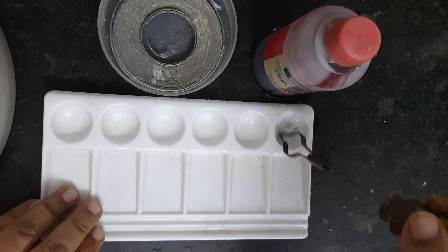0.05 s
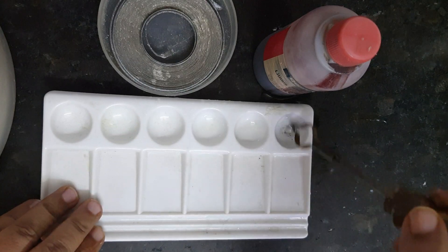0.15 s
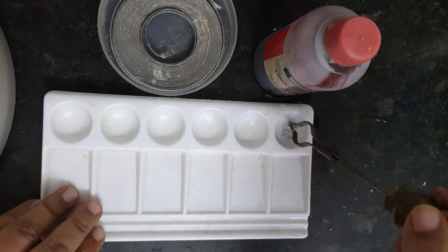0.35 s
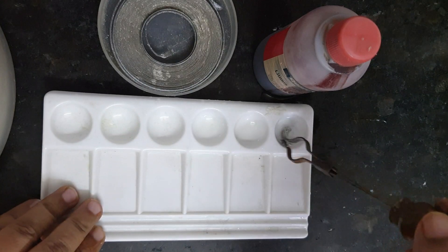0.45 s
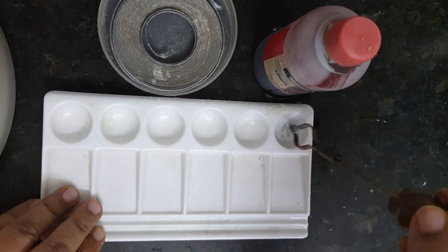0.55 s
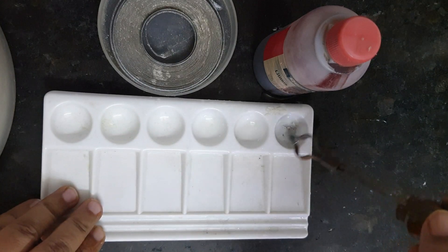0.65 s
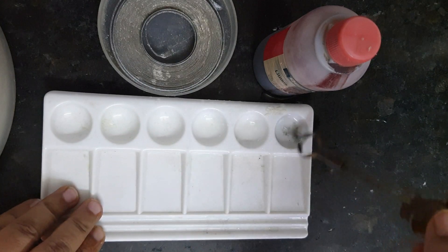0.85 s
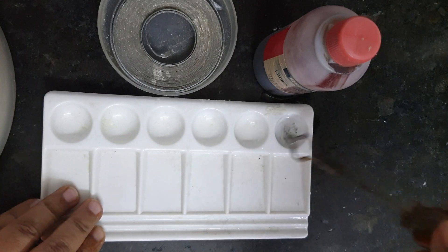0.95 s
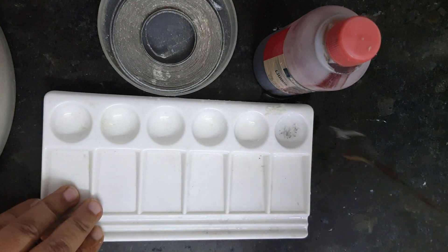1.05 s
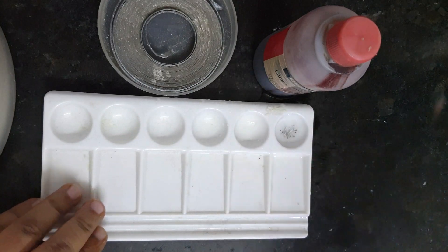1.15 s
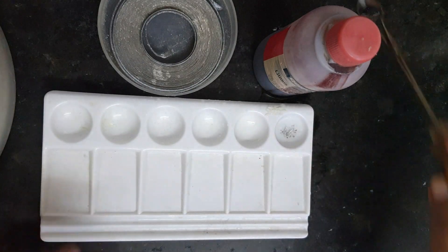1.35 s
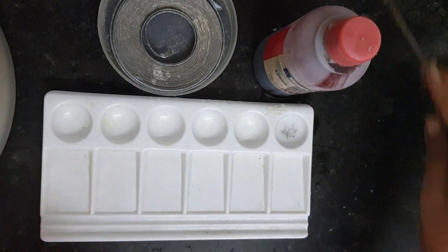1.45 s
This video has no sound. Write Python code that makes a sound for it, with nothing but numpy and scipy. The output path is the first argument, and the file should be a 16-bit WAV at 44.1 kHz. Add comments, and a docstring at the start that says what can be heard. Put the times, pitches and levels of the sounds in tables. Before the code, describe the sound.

Metal tongs stir wet powder in a ceramic well, close to a mono microphone. From 0 to 0.9 seconds come irregular light taps with short, hollow, damped rings, brief grainy scrapes and tiny squeaks. A squeaky scrape stands out near 0.2, firmer knocks near 0.4, 0.6 and 0.83. A short room tail fades into faint low hum and air; a very soft low bump comes around 1.4.

```python
"""Stirring powder with steel tongs

Steel tongs stir wet powder in the well of a ceramic tile, close by in a classroom. Their tips tap the well
(decaying modes), scrape across it (grainy friction noise) and catch in short stick-slip squeaks (harmonic tones).
Taps and scrapes ring the tile, and the room answers with near reflections and a tail.
The stirring stops, a hand leaves the table with a soft low bump, and the room's noise and hum remain."""
import sys
import numpy as np
from scipy import signal
from scipy.fft import rfft, irfft, next_fast_len
from scipy.io import wavfile
from scipy.ndimage import map_coordinates

SR = 44100
rng = np.random.default_rng(int(sys.argv[2]) if len(sys.argv) > 2 else 0)


def pcm_store(signal):
    """Save signal as 16-bit PCM."""
    levels = np.round(np.clip(np.atleast_2d(signal), -1, 1) * 32767)
    wavfile.write(sys.argv[1], SR, levels.astype(np.int16).T)


N = 66150

# Relative spectrum of steel grating on glaze. Each row: frequency in Hz, level in dB.
GRIT_SPECTRUM = [(300, -47.5), (1000, -13.5), (1700, 4), (2250, 4), (2600, 0), (3050, -10), (3600, -1.5),
                 (4300, -1), (6200, -0.5), (7400, -6), (8400, -1.5), (9300, -19.5), (11000, -11.5),
                 (13000, -42), (16000, -37)]


def taps():
    """Impact excitation: each tap knocks and flexes the tile and gives a short bright tick."""
    # Taps of the tips on the well. Each row: start in seconds, knock level in dB, bright tick level in dB.
    tap_list = [(.0905, -49, -73.5), (.0965, -48.5, -67), (0.154, -39.5, -61.5), (.1600, -42, -59),
                (.2485, -43, -52), (.3150, -43.5, -81), (.3890, -24.5, -55), (.3970, -35, -57.5),
                (.4235, -36.5, -67), (.5810, -32.5, -52), (.5868, -41, -47), (.5968, -34.5, -66.5),
                (.6360, -45.5, -74), (.6545, -45.5, -62.5), (.7630, -45.5, -75), (.8305, -22.5, -52.5)]
    flex_hz, flex_db, flex_t60_s = 428, -27.5, 0.06  # flexing of the whole tile, level against the knock
    tick_t60_s = 0.018
    out = np.zeros(N + SR)
    for start_s, knock_db, tick_db in tap_list:
        ring = tile_ring()
        t = np.arange(len(ring)) / SR
        flex_envelope = amp(flex_db - 60 * t / flex_t60_s) * (1 - np.exp(-t * flex_hz))
        flex = flex_envelope * np.sin(2 * np.pi * flex_hz * t)
        tick = noise(GRIT_SPECTRUM)[:len(t)] * amp(-60 * t / tick_t60_s)
        first = round(start_s * SR)
        out[first:first + len(t)] += amp(knock_db) * (ring + flex) + amp(tick_db) * tick
    return out[:N]


def scrapes():
    """Friction noise: uneven grains hiss at the tips and shake the tile into resonance."""
    # Scrapes through the powder. Each row: time of the peak, rise and fall in seconds,
    # tile level in dB, grit level in dB.
    scrape_list = [(.004, 0.0065, 0.039, -56, -63), (0.095, 0.023, 0.015, -61, -71),
                   (0.215, 0.018, 0.0095, -38.5, -52), (0.222, 0.0068, 0.0073, -40, -46.5),
                   (.255, 0.018, 0.0235, -54.5, -68), (0.43, 0.01045, 0.0078, -50.5, -60),
                   (.478, 0.06, 0.017, -56, -68), (0.544, 0.0083, 0.018, -57.5, -70.5),
                   (0.59, 0.0046, 0.018, -53, -55), (0.623, 0.045, 0.027, -53.5, -68),
                   (0.671, 0.0264, 0.0057, -53.5, -60.5), (0.765, 0.019, 0.0076, -52, -73.5),
                   (0.832, .005, .006, -57, -52.5), (0.855, 0.0068, 0.036, -50.5, -67),
                   (0.893, 0.0062, 0.0086, -51.5, -56)]
    grains_per_s, grain_db = 900, 3  # speed and depth of the unevenness
    grains = unit(amp(grain_db * wobble(grains_per_s)))
    shaking = grains * rng.standard_normal(N)
    body = unit(signal.fftconvolve(shaking, tile_ring())[:N])
    grit = grains * noise(GRIT_SPECTRUM)
    out = np.zeros(N)
    for peak_s, rise_s, fall_s, tile_db, grit_db in scrape_list:
        out += swell(peak_s, rise_s, fall_s) * (amp(tile_db) * body + amp(grit_db) * grit)
    return out


def squeaks():
    """Stick-slip oscillation: a tip catches at one of the tongs' resonances, an unsteady tone with overtones."""
    # Each row: time of the peak, rise and fall in seconds, mean pitch in Hz, rms level of the
    # fundamental at the peak in dB, then the second and the third partial in dB against the fundamental.
    squeak_list = [(.002, 0.018, 0.0071, 1450, -42, -33, -27), (.002, 0.012, 0.0079, 2010, -53, -11, -5.5),
                   (.214, 0.011, 0.0029, 875, -36, -38, -30.5),
                   (0.2185, 0.0078, 0.0043, 722, -24.5, -17, -37.5),
                   (0.216, 0.0075, 0.002, 1435, -34.5, -29, -35.5),
                   (0.212, 0.012, 0.022, 1968, -52.5, -26, -22), (.255, 0.01, 0.011, 735, -43, -8, -34.5),
                   (0.436, 0.012, 0.0042, 708, -35.5, -10.5, -50),
                   (0.588, 0.0025, 0.0028, 2252, -45, -15, -33),
                   (.588, 0.0053, 0.0035, 1298, -44.5, -15, -17.5),
                   (0.664, 0.018, 0.011, 1375, -62.5, -2, -32.5),
                   (.670, 0.0049, 0.0047, 2056, -52.5, -5.5, -6),
                   (.678, 0.00618, 0.00834, 1437, -48, -28.5, -26.5),
                   (0.884, 0.0046, 0.013, 2001, -45, -16, -13.5),
                   (0.895, 0.0084, 0.0075, 1446, -48, -45, -30),
                   (.901, .008, 0.0063, 690.5, -43.5, -7, -21)]
    pitch_scatter, wander_per_s = 0.016, 480  # fraction of the pitch, random knots a second
    fourth_drop_db = 3.5  # the fourth partial lies this far below the third
    out = np.zeros(N)
    for peak_s, rise_s, fall_s, hz, db, second_db, third_db in squeak_list:
        pitch = hz * (1 + pitch_scatter * wobble(wander_per_s))
        phase = 2 * np.pi * np.cumsum(pitch) / SR
        partials_db = [0, second_db, third_db, third_db - fourth_drop_db]
        tone = sum(amp(level) * np.sin(k * phase) for k, level in enumerate(partials_db, start=1))
        out += np.sqrt(2) * amp(db) * swell(peak_s, rise_s, fall_s) * tone
    return out


def tile_ring():
    """Modal synthesis: the tile's answer to one contact, a sum of decaying modes scaled to peak 1."""
    # Modes before radiation and damping. Each row: frequency in Hz, mean level in dB, t60 in seconds.
    modes = [(623.2, -8.5, 0.053), (754.4, -1, 0.045), (856.7, 7, 0.019), (926, -3.5, 0.021),
             (1062, -5.5, 0.027), (1243, -15, .025), (1450, -31, 0.046), (2097, -33.5, .04),
             (2213, -25.5, .03)]
    spot_db = 2.5  # scatter of the mode levels from one spot to another
    contact_s = 0.00077  # rise of a knock
    low_hz, high_hz = 631, 1780
    t = np.arange(SR // 5) / SR
    ring = np.zeros(len(t))
    for hz, db, t60 in modes:
        level_db = db + spot_db * rng.standard_normal()
        ring += amp(level_db - 60 * t / t60) * np.sin(2 * np.pi * hz * t)
    ring *= 1 - np.exp(-(t / contact_s) ** 2)
    ring = cut(ring, low_hz, "high", order=5)  # the small tile radiates little bass
    ring = cut(ring, high_hz, "low", order=2)  # the wet paste dulls its top
    return ring / np.abs(ring).max()


def room(x, count=10):
    """Reverberation: convolution with a few near reflections and a tail of decaying coloured noise."""
    # Decay of the tail. Each row: frequency in Hz, t60 in seconds.
    tail_t60 = [(200, .5), (700, 0.44), (2000, 0.32), (5000, .36), (12000, .22)]
    # Relative spectrum of the tail. Each row: frequency in Hz, level in dB.
    tail_colour = [(200, 6.5), (750, -8.5), (1000, -1), (1450, -1), (2000, 2), (3000, 7.5), (5000, -3),
                   (12000, -6.5)]
    tail_db, tail_rise_s = -10.5, 0.0045
    near_db, near_s = -21, 0.028  # reflections: level and latest delay
    hz, t, z = signal.stft(rng.standard_normal(SR * 3 // 4), SR, nperseg=256)
    decay_db = along(tail_colour, hz)[:, None] - 60 * t / along(tail_t60, hz)[:, None]
    tail = signal.istft(z * amp(decay_db), SR, nperseg=256)[1]
    tail = tail * (1 - np.exp(-np.arange(len(tail)) / SR / tail_rise_s))
    delays = (SR * near_s * rng.uniform(0.11, 1, count)).astype(int)
    near = np.bincount(delays, rng.standard_normal(count), len(tail))
    answer = amp(tail_db) * tail / np.linalg.norm(tail) + amp(near_db) * near / np.linalg.norm(near)
    return signal.fftconvolve(x, answer)[:N]


def bump():
    """Pulsed low tone: the hand leaves the table with one soft thud, a sine under a bell-shaped envelope."""
    peak_s, hz, db, width_s = 1.424, 70, -61, 0.009
    return amp(db) * swell(peak_s, width_s, width_s) * np.sin(2 * np.pi * hz * (peak_s - clock()))


def background(waver=0.62):
    """Stationary noise and amplitude modulation: coloured room noise under slightly unsteady hum tones."""
    # Relative spectrum of the room noise. Each row: frequency in Hz, level in dB.
    air_spectrum = [(15, -41.5), (30, -17), (60, -2), (95, -1), (125, -7.5), (230, -12), (280, -2),
                    (320, -8), (480, -15), (575, -4.5), (650, -12), (800, -21), (1400, -19.5), (2200, -29),
                    (3200, -25), (7000, -17), (15500, -19)]
    # Hum tones. Each row: frequency in Hz, rms level before the wavering in dB.
    hum_tones = [(81, -82), (100, -77.5), (264, -90.5), (292, -91.5), (490, -88), (578, -83)]
    air_db = -69.5  # rms
    hum = np.zeros(N)
    for hz, db in hum_tones:
        level = amp(db) * np.sqrt(2) * (1 + waver * wobble(11))
        hum += level * np.sin(2 * np.pi * (hz * clock() + rng.random()))
    return amp(air_db) * noise(air_spectrum) + hum


def amp(db):
    """Logarithmic level: decibels to gain."""
    return 10 ** (np.asarray(db) / 20)


def unit(x):
    """Mean power: scale to rms 1."""
    return x / np.sqrt(np.mean(x ** 2) + 1e-20)


def clock():
    """Uniform sampling: time of every sample in seconds."""
    return np.arange(N) / SR


def along(points, hz):
    """Linear interpolation of (Hz, value) points on a logarithmic frequency axis."""
    f, v = np.transpose(points)
    return np.interp(np.log(hz + 1), np.log(f + 1), v)


def wobble(rate):
    """Spline interpolation: a smooth random curve with rate knots a second."""
    return map_coordinates(rng.standard_normal(N // 8), [clock() * rate], mode="wrap")


def filtered(x, response):
    """Linear filtering: the spectrum of x times a response of frequency, zero-padded."""
    m = next_fast_len(N + SR // 2)
    return irfft(rfft(x, m) * response(np.fft.rfftfreq(m, 1 / SR)), m)[:N]


def noise(spectrum):
    """Spectral shaping: coloured noise of rms 1."""
    return unit(filtered(rng.standard_normal(N), lambda hz: amp(along(spectrum, hz))))


def swell(peak_s, rise_s, fall_s):
    """Gaussian envelope: a rounded rise and fall with its own width on each side of the peak."""
    t = clock() - peak_s
    return np.exp(-(t / np.where(t < 0, rise_s, fall_s)) ** 2)


def cut(x, hz, kind, order):
    """Butterworth filtering: a causal high-pass or low-pass."""
    return signal.sosfilt(signal.butter(order, hz, kind, fs=SR, output="sos"), x)


def scene():
    """Superposition: direct stirring, its reverberation, the background and the bump, in one channel."""
    stirring = taps() + scrapes() + squeaks()
    return (stirring + room(stirring) + background() + bump())[None]


def record(dry):
    """Band limitation: the microphone keeps nothing from its upper limit on."""
    top_hz = 15800
    return np.array([filtered(channel, lambda hz: hz < top_hz) for channel in dry])


dry = scene()
out = record(dry)
pcm_store(out)
```